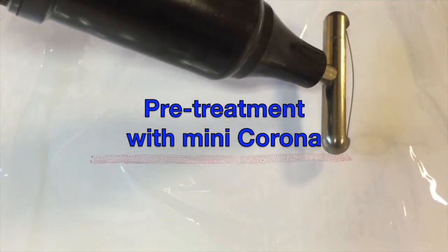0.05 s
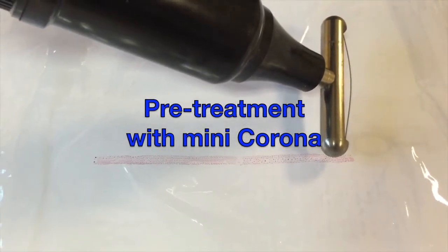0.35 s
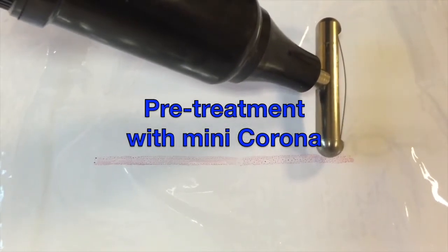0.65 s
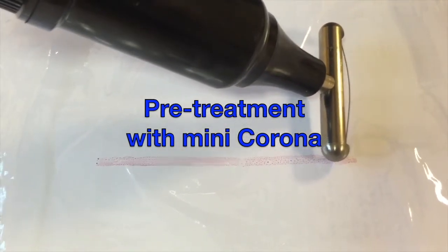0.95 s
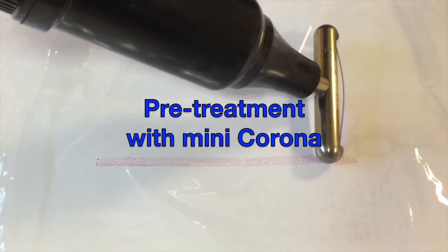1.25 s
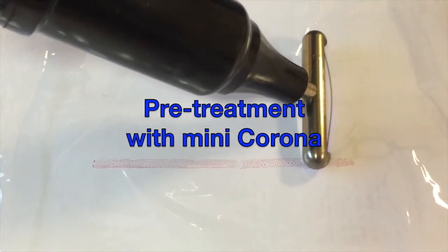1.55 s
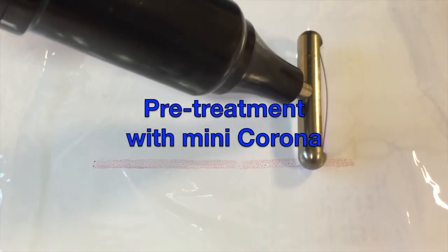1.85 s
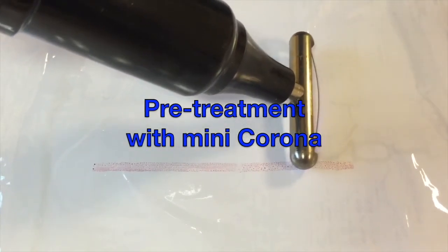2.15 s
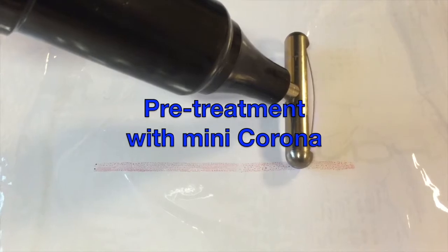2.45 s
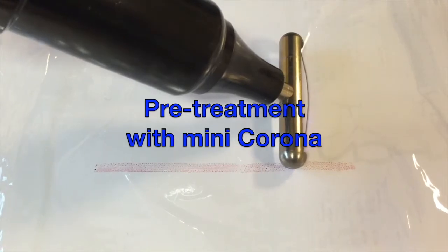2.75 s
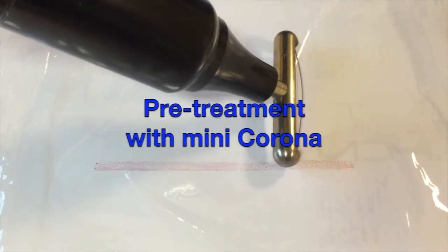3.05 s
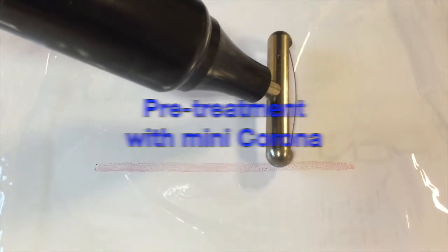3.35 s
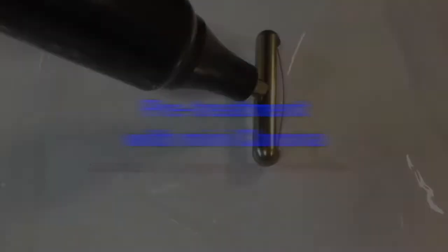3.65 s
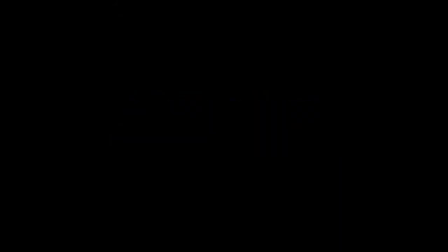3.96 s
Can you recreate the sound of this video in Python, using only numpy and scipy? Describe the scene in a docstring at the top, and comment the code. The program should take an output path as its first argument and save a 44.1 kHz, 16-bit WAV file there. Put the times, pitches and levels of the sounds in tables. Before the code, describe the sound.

A handheld electrical tool crackles and buzzes with tiny sparks, close up.

```python
"""Corona treater over plastic film

A handheld treater is drawn slowly over film on a bench, close to the microphone in a small, dry room.
On each half-cycle of the mains a burst of tiny sparks jumps from the electrode: it sputters at first,
settles into a sizzling buzz, then skips again. The spark gap in the handle fizzes and the supply hums
throughout. Dull room noise lies behind, and a soft low rumble comes up at the end."""
import sys
import numpy as np
from scipy import signal
from scipy.fft import rfft, irfft
from scipy.io import wavfile
from scipy.ndimage import uniform_filter1d

SR = 44100
rng = np.random.default_rng(int(sys.argv[2]) if len(sys.argv) > 2 else 0)


def persist_wave(psi):
    """Save psi, clipped to +-1, as 16-bit WAV."""
    counts = np.round(np.clip(psi, -1, 1) * 32767).astype(np.int16)
    wavfile.write(sys.argv[1], SR, np.atleast_2d(counts).T)


N = 176400

# room noise behind the treater (frequency [Hz], relative level [dB])
ROOM_COLOUR = [(25, -28), (42, -4), (58, 1.5), (85, 1), (135, -8.5), (170, -2), (225, -5), (265, -5.5),
               (335, -15), (450, -12), (600, -13), (850, -19)]
# closing rumble (frequency [Hz], relative level [dB])
RUMBLE_COLOUR = [(30, -19), (70, -10), (105, 5), (200, -15), (300, -3), (375, -3.5), (430, -16.5),
                 (1000, -49)]
# swell of that rumble (time [s], level [dB])
RUMBLE_SWELL = [(3.1, -77.5), (3.72, -64), (3.85, -56), (3.91, -69), (3.94, -66), (3.98, -49), (4, -47.5)]
# tones of the supply (frequency [Hz], level before waver and fade [dB])
HUM_TONES = [(68.5, -74.5), (100, -70), (120, -74), (199.8, -68.5), (262, -85.5), (499.6, -83.5),
             (699.4, -67.5), (1000, -79.5), (1199, -73.5), (1498.6, -80)]
# narrow rushing band, likely a cooling fan (frequency [Hz], relative level [dB])
FAN_COLOUR = [(450, -23), (620, -13), (668, -2), (692, -1), (735, -13.5), (860, -30)]
# closing fade of hum and fan (time [s], gain [dB])
SUPPLY_FADE = [(3.35, 0.5), (4, -5)]
# ring of the handle's casing (frequency [Hz], relative level [dB])
CASING_COLOUR = [(1000, -23.5), (1600, -16), (2400, -12.5), (3200, -16), (4000, -17), (5150, -19),
                 (6000, -15), (6650, -8), (7100, -19), (7850, -9.5), (8500, -6.5), (9200, -15.5),
                 (10300, -10.5), (10720, -3.5), (11100, -15.5), (11700, 1), (12400, -8.5), (13100, -10),
                 (13800, -37), (14400, -16), (14900, -3), (15300, -7), (15800, -7)]
# the handle's fizz at the microphone (time [s], level [dB])
HANDLE_LEVEL = [(0, -43.5), (1, -44.5), (3, -47), (3.5, -46.5), (4, -49.5)]
# stretches in which the discharge holds, firmly or faltering (start [s], end [s], strength [dB])
DISCHARGE_SPANS = [(.02, .04, 0.5), (.05, .06, -12), (.07, .08, -2.5), (.12, .14, -2.5), (.15, .16, -5.5),
                   (.17, .18, -9.5), (.19, .2, 2.5), (.22, .24, -4.5), (.25, .26, -4), (.3, .31, -6.5),
                   (.32, .34, -11), (.35, .36, -5.5), (.37, .38, -2.5), (.39, .4, -0.5), (.41, .42, -5.5),
                   (.43, .44, -1.5), (.46, .47, 0.5), (.48, .5, -1), (.52, .56, 0), (.56, .57, -8),
                   (.57, .58, -5), (.58, .59, 0.5), (.6, .62, .5), (.63, .64, 0.5), (.66, .69, -1.5),
                   (.69, .7, -10), (.71, .72, -1.5), (.73, .75, -2), (.76, .78, 0), (.79, .83, -1.5),
                   (.84, .87, -1), (.88, .89, -1.5), (.89, .9, -4.5), (.91, .92, -1.5), (.93, .94, -0.5),
                   (.95, 1.02, -3), (1.03, 1.16, -1.5), (1.17, 1.63, 0), (1.63, 1.64, -5), (1.64, 1.79, 0),
                   (1.79, 1.8, -6), (1.8, 1.87, 0), (1.88, 1.91, -0.5), (1.92, 1.94, -1.5), (1.95, 2.13, 0),
                   (2.13, 2.16, -3.5), (2.16, 2.29, .3), (2.3, 2.6, -0.5), (2.61, 2.69, .5),
                   (2.7, 2.79, .5), (2.8, 2.85, 1), (2.85, 2.93, -.7), (2.94, 3.02, 0), (3.03, 3.09, 0),
                   (3.1, 3.13, -2.5), (3.14, 3.15, -2.5), (3.16, 3.17, 0), (3.18, 3.2, -2.5),
                   (3.21, 3.22, -0.5), (3.23, 3.24, 1.5), (3.25, 3.27, .3), (3.28, 3.32, 0.5),
                   (3.33, 3.34, -8), (3.34, 3.38, 0), (3.41, 3.42, 0), (3.43, 3.48, 1.5), (3.49, 3.5, 0),
                   (3.51, 3.54, 1), (3.55, 3.62, 0), (3.63, 3.64, 1), (3.65, 3.78, 1.5), (3.79, 3.96, 1),
                   (3.97, 3.98, -1.5), (3.99, 4, -0.5)]
# the pass over the film (time [s], relative spark level [dB], base burst length [ms])
FILM_PASS = [(0, -2, 5.17), (.55, -1.2, 5.2), (1.1, -1, 5.9), (1.45, -3, 6.2), (1.7, -1.65, 5.92),
             (2.1, -0.3, 5.77), (2.7, -1.5, 5.73), (3.3, .5, 5.4), (3.68, -2, 6), (3.82, -4, 5.4),
             (4, -7, 5.3)]
# sparks heard close up, early in the pass (frequency [Hz], relative level [dB])
EARLY_COLOUR = [(530, -43), (900, -26), (978, -18), (1120, -24), (1160, -15), (1260, -18.5), (1450, -15.5),
                (1780, -9), (1910, -8.5), (2390, -8), (2570, -4.5), (2800, -7.5), (3270, 1), (3680, -2.5),
                (4000, 0.5), (5200, -9.5), (6150, -4), (7010, -4.5), (7810, -15.5), (8490, -5),
                (10000, -18), (10900, -6), (12100, -2.5), (14900, -4.5), (15600, -9)]
# the same sparks late in the pass (frequency [Hz], relative level [dB])
LATE_COLOUR = [(530, -58), (900, -27.5), (978, -20), (1050, -22), (1300, -19.5), (1450, -17), (1560, -16.5),
               (1930, -9), (2340, -12), (2600, -7.5), (2860, -10.5), (3190, -2), (3590, -4.5), (4050, -1),
               (5080, -10.5), (5590, -4), (6080, -10.5), (6850, -8.5), (8090, -10), (9340, -14),
               (10400, -11.5), (11300, -9), (13000, -2), (14500, -4), (15600, -9.5)]

BURST_HZ, FIRST_CREST_S = 99.92, .004  # one burst per half-cycle of the mains
SPARK_HZ, SPARK_JITTER, CROWDING = 3693, .24, .93  # nominal rate and spacing within a burst
SPARK_SCATTER_DB, BURST_SCATTER_DB, POLARITY_DB = 1.76, .91, .6
EDGE_DB = 2  # the slow first and last sparks of a burst are the bigger ones
RISE_DB = 1.5  # sparks grow through a burst as the air ionises
RESTRIKE_DB = 1  # the first burst after a gap is stronger
LENGTH_SHARE = .55  # share of a burst's strength that goes into its length


def undb(db):
    """Decibels to gain."""
    return 10 ** (np.asarray(db) / 20)


def level(x, db):
    """Sets the rms level."""
    return x * undb(db) / np.sqrt(np.mean(x ** 2))


def curve(table, t, column=1):
    """One column of a table at times t."""
    table = np.array(table)
    return np.interp(t, table[:, 0], table[:, column])


def wander(rate_hz):
    """Slow random wander with a spread near 1."""
    step = int(SR / rate_hz)
    return uniform_filter1d(np.repeat(rng.standard_normal(N // step + 1), step), step)[:N]


def colour(x, points, below=2, above=0):
    """Gives x a spectrum through a causal filter; below and above are the roll-off orders outside it."""
    hz, db = np.array(points).T
    f = np.maximum(np.arange(N // 2 + 1) * SR / N, 1)
    spectrum = rfft(x)
    own_shape = np.sqrt(uniform_filter1d(abs(spectrum) ** 2, size=601))
    gain = undb(np.interp(np.log(f), np.log(hz), db))
    gain *= np.minimum(f / hz[0], 1) ** below * np.minimum(hz[-1] / f, 1) ** above
    cepstrum = irfft(np.log(gain / own_shape + 1e-18), N)
    cepstrum[1:N // 2] *= 2  # minimum phase: the ringing follows each click
    cepstrum[N // 2 + 1:] = 0
    return irfft(spectrum * np.exp(rfft(cepstrum)), N)


def reflections(x, t60_s):
    """A dense decaying cloud of reflections."""
    t = np.arange(SR // 2) / SR
    response = rng.standard_normal(len(t)) * np.exp(-np.log(1000) * t / t60_s) * (1 - np.exp(-t * 2000))
    return signal.fftconvolve(x, response / np.linalg.norm(response))[:N]


def background(t):
    """Dull room noise and the closing rumble."""
    room = level(colour(rng.standard_normal(N), ROOM_COLOUR, above=1), db=-66)
    rumble = level(colour(rng.standard_normal(N), RUMBLE_COLOUR, above=.9), db=0)
    return room + rumble * undb(curve(RUMBLE_SWELL, t))


def supply_hum(t):
    """Wavering hum and fan-like rush of the supply, and a deep tone that dies away at the start."""
    tones = np.zeros(N)
    for hz, db in HUM_TONES:
        gain = undb(db + 2.5 * wander(rate_hz=21.99))
        tones += gain * np.sin(2 * np.pi * (hz * t + rng.random()))
    fan = level(colour(rng.standard_normal(N), FAN_COLOUR, above=1.22), db=-69)
    drone = undb(-55.5) * np.exp(-t / .25) * np.sin(2 * np.pi * 66 * t)
    return (np.sqrt(2) * tones + fan) * undb(curve(SUPPLY_FADE, t)) + np.sqrt(2) * drone


def spark_bursts(crests, length_s, gain, max_sparks=48):
    """A burst of clicks around each voltage crest; they crowd together where the voltage is highest."""
    wait, scatter = rng.standard_normal((2, len(crests), max_sparks))
    charge = (np.cumsum(np.exp(SPARK_JITTER * wait), axis=1) - .5) / (SPARK_HZ * length_s[:, None])
    place = 2 * np.minimum(charge, 1) - 1  # -1 at the start of a burst, 1 at its end
    when_s = crests[:, None] + length_s[:, None] / 2 * np.arcsin(CROWDING * place) / np.arcsin(CROWDING)
    size_db = SPARK_SCATTER_DB * scatter + EDGE_DB * place ** 2 + RISE_DB * place
    size = (gain[:, None] * undb(size_db) * (charge < 1)).ravel()
    at = when_s.ravel() * SR
    clicks = np.zeros(N)
    for tap in range(-6, 7):  # a windowed sinc places each click between samples
        i = at.astype(int) + tap
        pulse = size * np.sinc(i - at) * np.sinc((i - at) / 7)
        np.add.at(clicks, np.clip(i, 0, N - 1), pulse * (i >= 0) * (i < N))
    return clicks


def handle_fizz(t, crests):
    """The spark gap in the handle fires on every half-cycle and rings its casing."""
    even = np.ones(len(crests))
    clicks = spark_bursts(crests, length_s=.008 * even, gain=even)
    casing = colour(reflections(clicks, t60_s=.026), CASING_COLOUR)
    return level(casing, db=0) * undb(curve(HANDLE_LEVEL, t))


def corona(t, crests):
    """Sparks jump to the film while the discharge holds; stronger bursts last longer."""
    lit, strength_db = np.zeros((2, len(crests)))
    for start, end, db in DISCHARGE_SPANS:
        inside = (crests > start) & (crests < end)
        lit[inside], strength_db[inside] = 1, db
    strength_db += RESTRIKE_DB * (np.diff(lit, prepend=0) > 0)
    strength_db += POLARITY_DB * (-1) ** np.arange(len(crests))  # one polarity is favoured
    strength_db += BURST_SCATTER_DB * rng.standard_normal(len(crests))
    length_s = curve(FILM_PASS, crests, column=2) / 1000 * undb(2 * LENGTH_SHARE * strength_db)
    length_s = np.minimum(length_s, .85 / BURST_HZ)  # a burst stays within its half-cycle
    gain = lit * undb(curve(FILM_PASS, crests) + (1 - LENGTH_SHARE) * strength_db)
    clicks = spark_bursts(crests, length_s, gain)
    clicks += undb(-5.5) * reflections(clicks, t60_s=.014)  # off the film and the bench
    early = level(colour(clicks, EARLY_COLOUR), db=0)
    late = level(colour(clicks, LATE_COLOUR), db=0)
    blend = np.interp(t, [1.2, 2.4], [0, 1])
    return level((1 - blend) * early + blend * late, db=-34)


def scene():
    """The treater close to one microphone, with its hum, in a small, dry room."""
    t = np.arange(N) / SR
    crests = np.arange(FIRST_CREST_S, N / SR, 1 / BURST_HZ)
    near = corona(t, crests) + handle_fizz(t, crests)
    walls = undb(-15) * reflections(near, t60_s=.17)
    return (near + walls + supply_hum(t) + background(t))[None]


def record(dry):
    """The recorder cuts the top steeply above 15.9 kHz."""
    return signal.sosfilt(signal.ellip(10, .2, 70, 15900, fs=SR, output="sos"), dry)


dry = scene()
out = record(dry)
persist_wave(out)
```